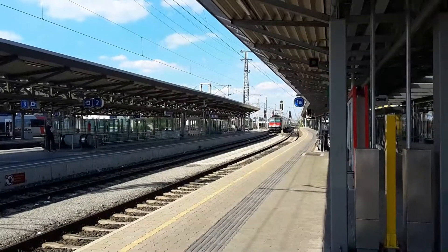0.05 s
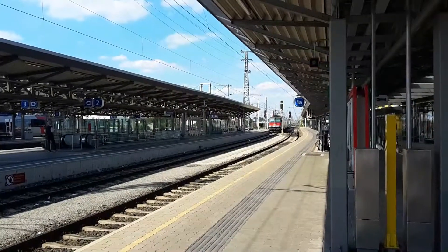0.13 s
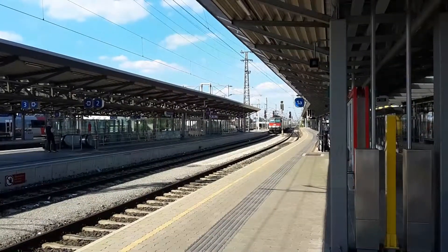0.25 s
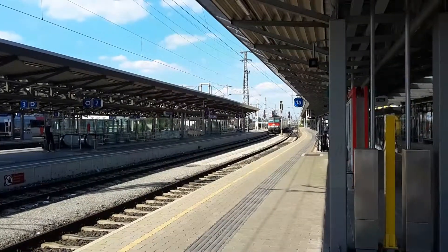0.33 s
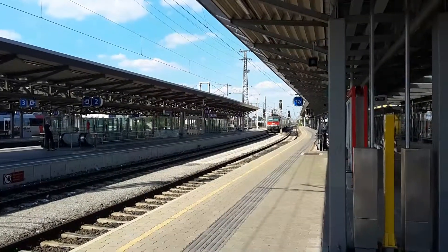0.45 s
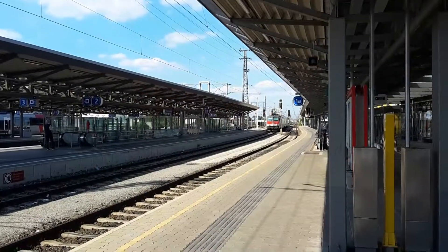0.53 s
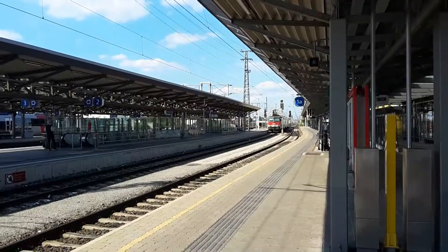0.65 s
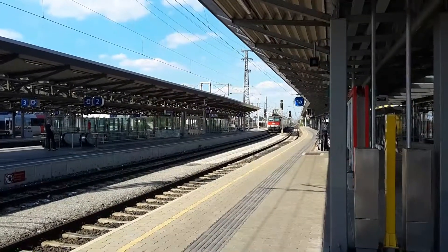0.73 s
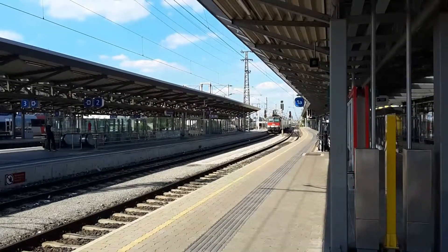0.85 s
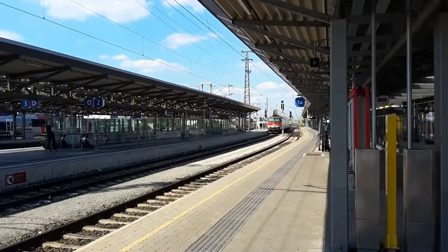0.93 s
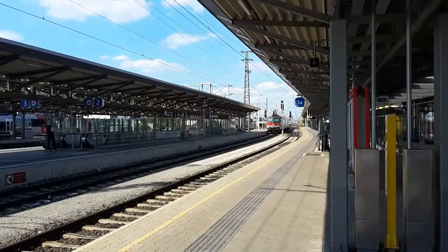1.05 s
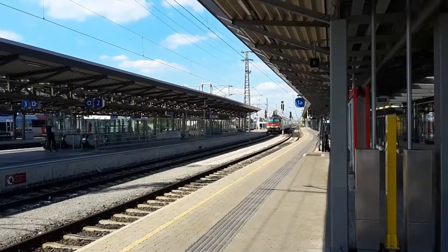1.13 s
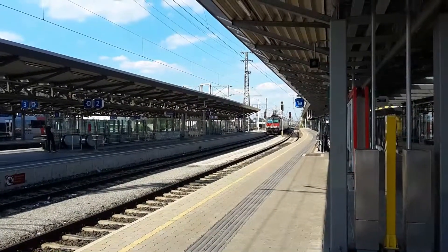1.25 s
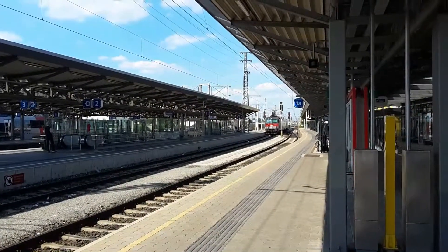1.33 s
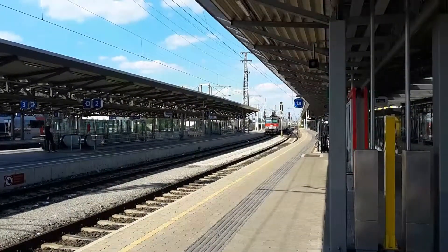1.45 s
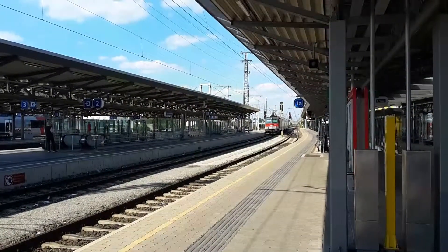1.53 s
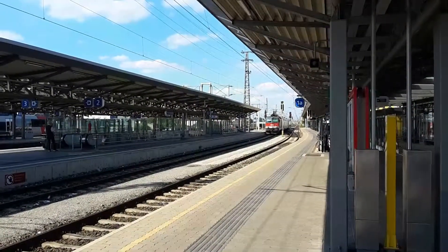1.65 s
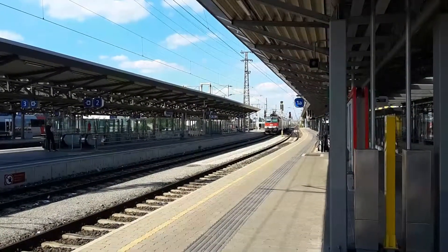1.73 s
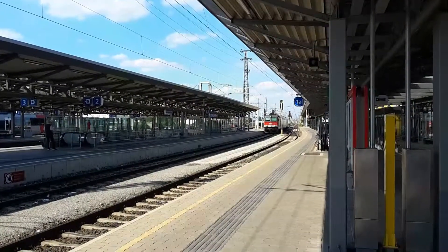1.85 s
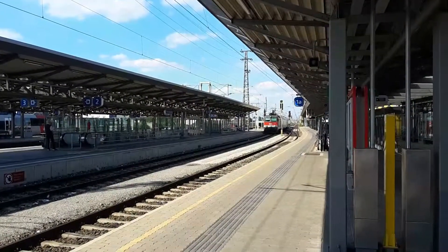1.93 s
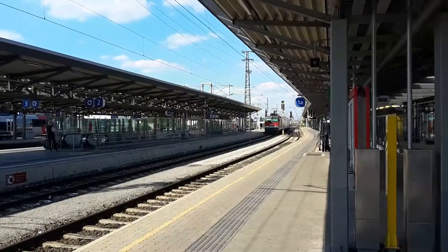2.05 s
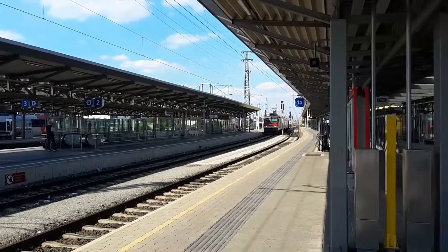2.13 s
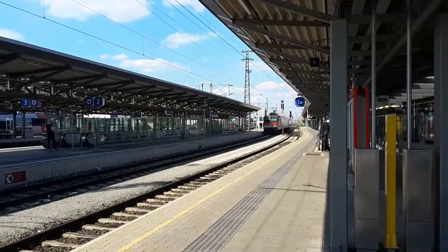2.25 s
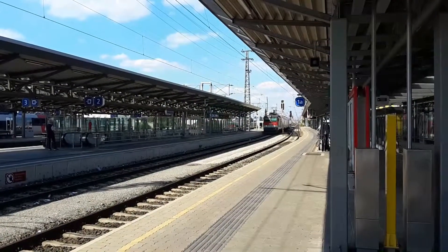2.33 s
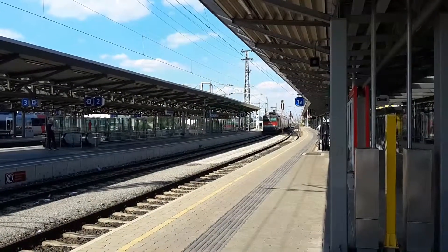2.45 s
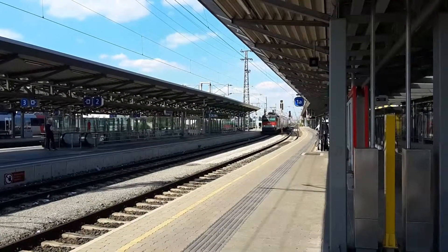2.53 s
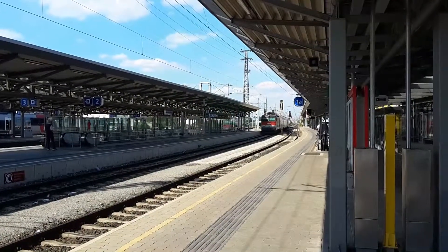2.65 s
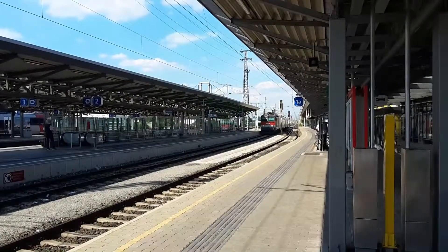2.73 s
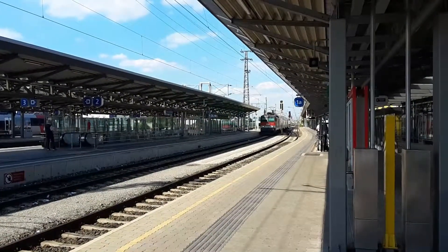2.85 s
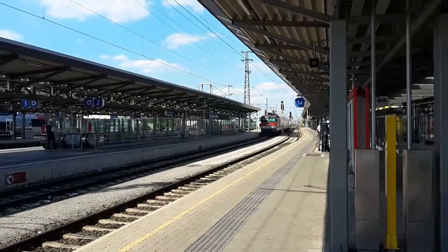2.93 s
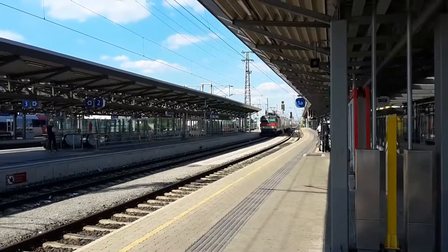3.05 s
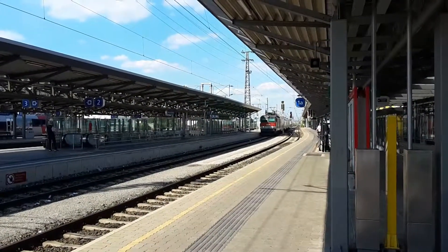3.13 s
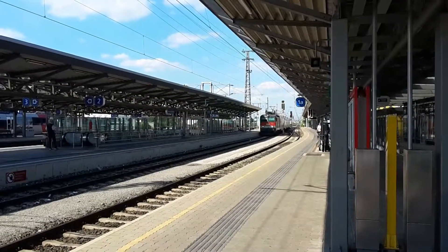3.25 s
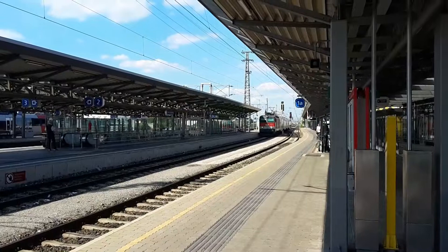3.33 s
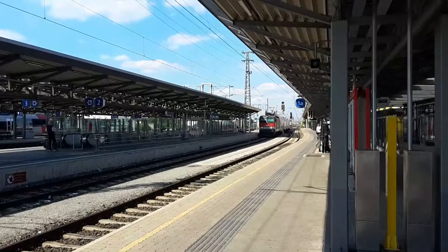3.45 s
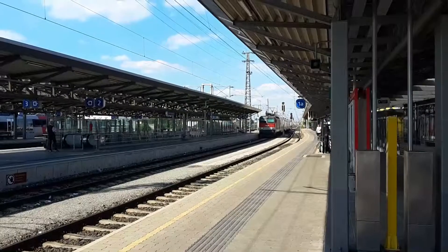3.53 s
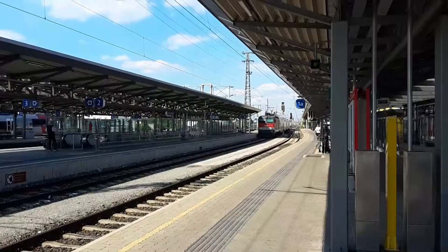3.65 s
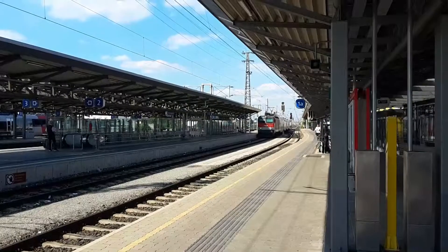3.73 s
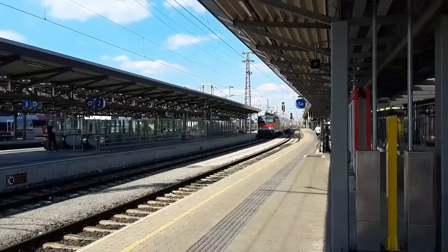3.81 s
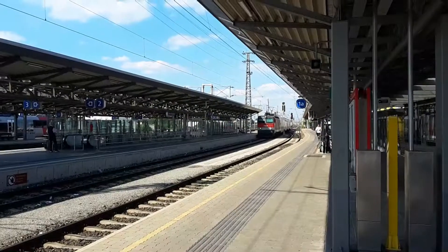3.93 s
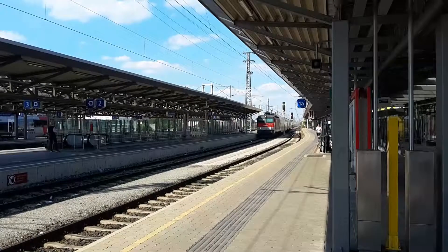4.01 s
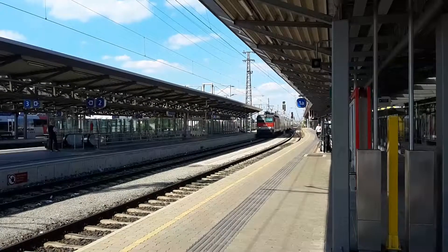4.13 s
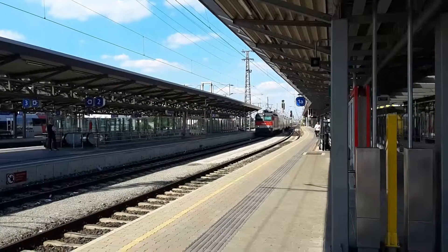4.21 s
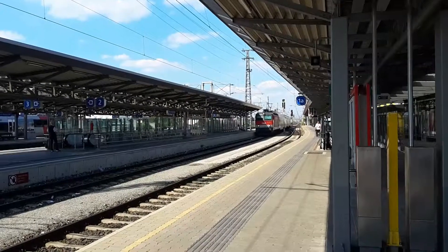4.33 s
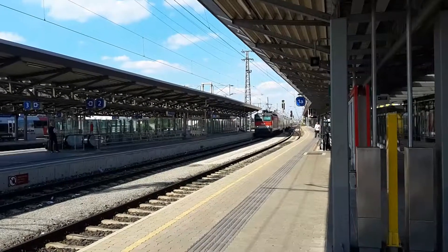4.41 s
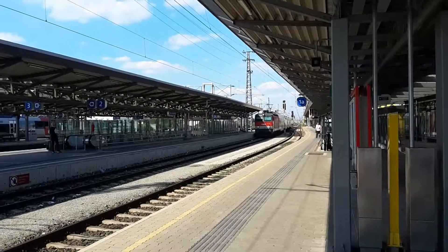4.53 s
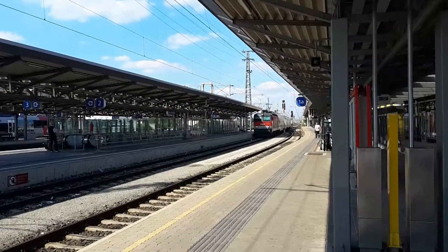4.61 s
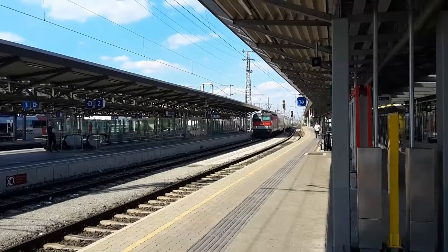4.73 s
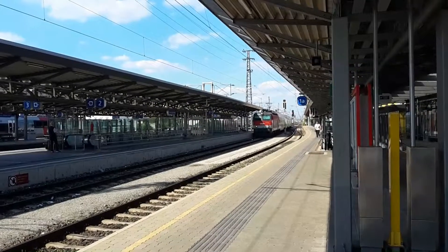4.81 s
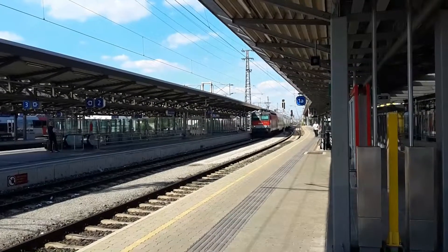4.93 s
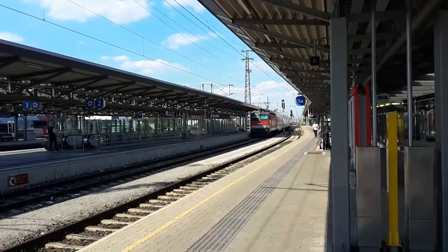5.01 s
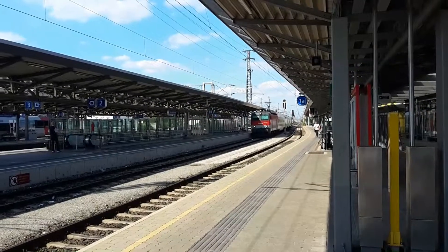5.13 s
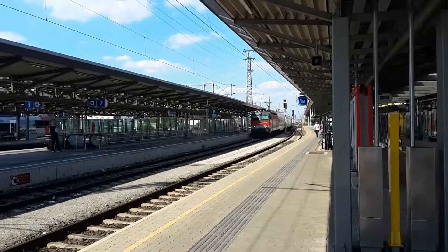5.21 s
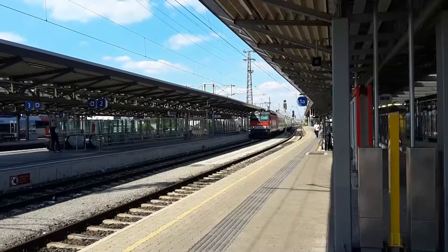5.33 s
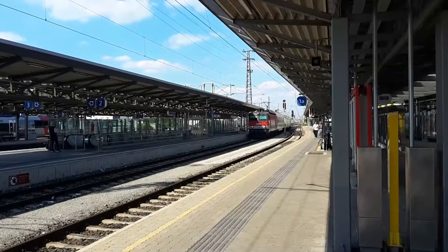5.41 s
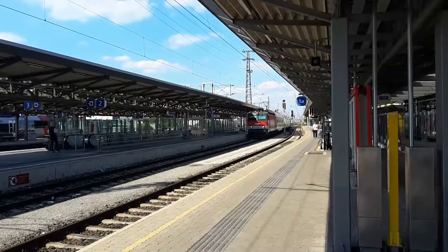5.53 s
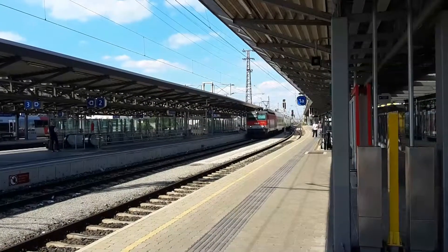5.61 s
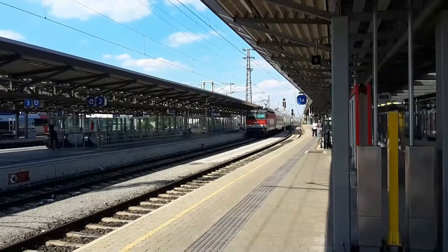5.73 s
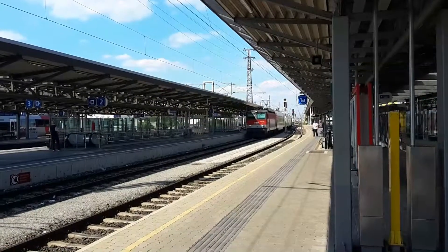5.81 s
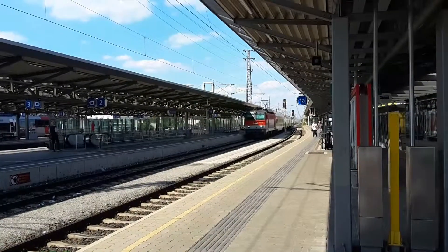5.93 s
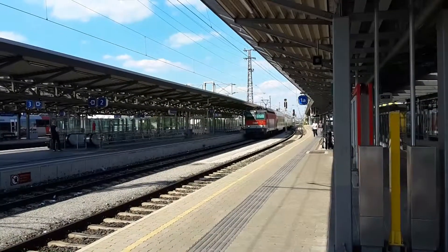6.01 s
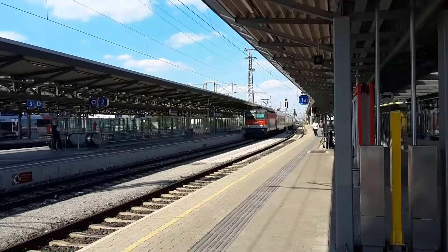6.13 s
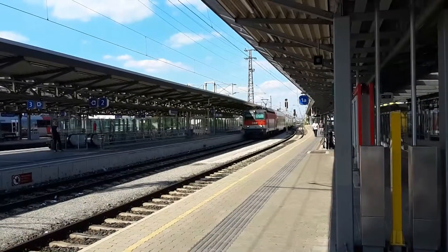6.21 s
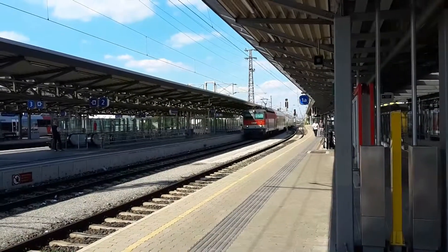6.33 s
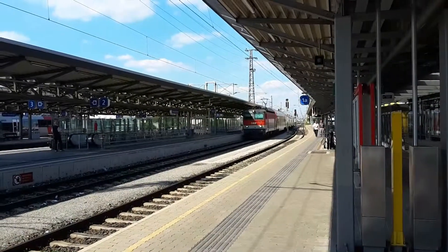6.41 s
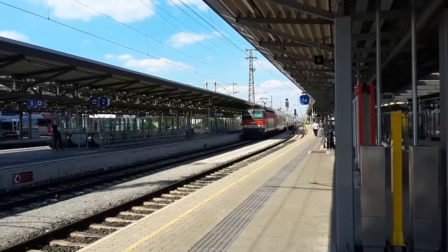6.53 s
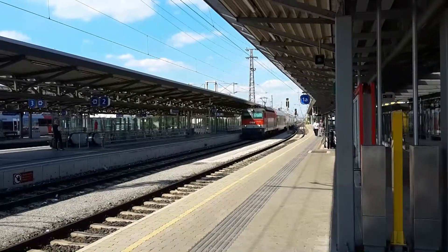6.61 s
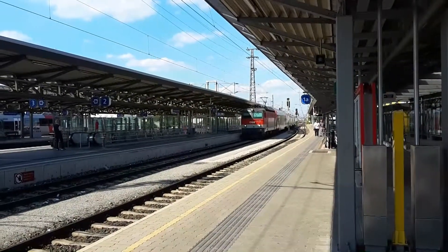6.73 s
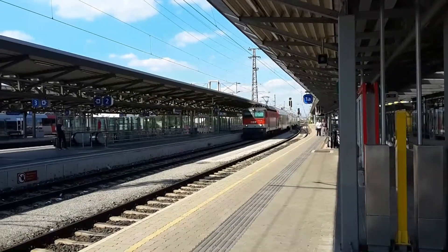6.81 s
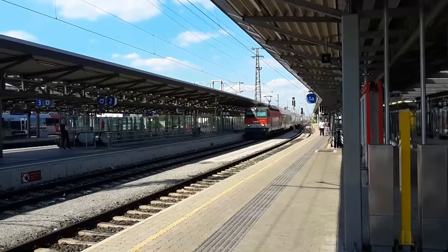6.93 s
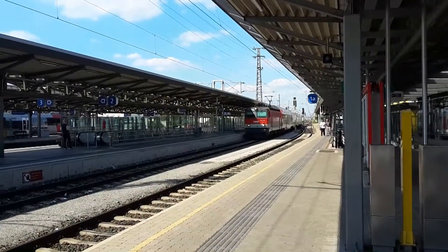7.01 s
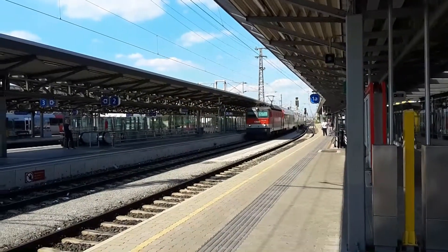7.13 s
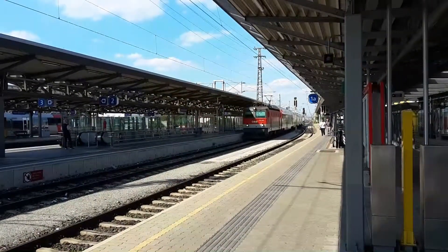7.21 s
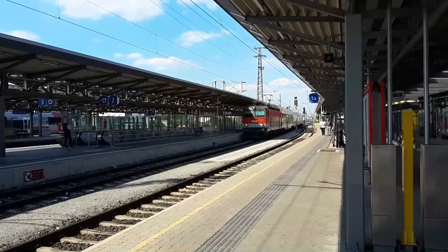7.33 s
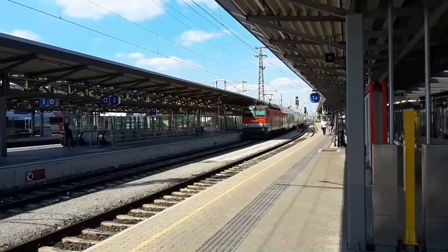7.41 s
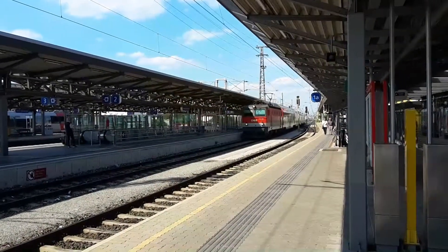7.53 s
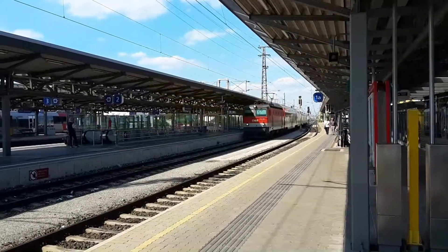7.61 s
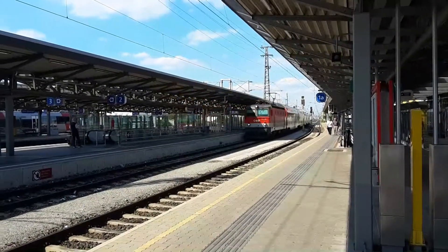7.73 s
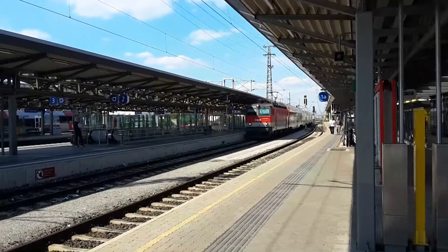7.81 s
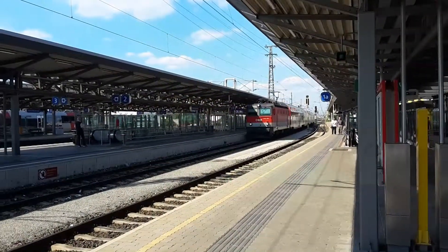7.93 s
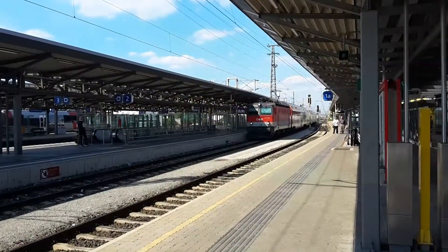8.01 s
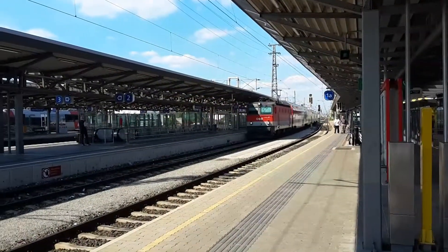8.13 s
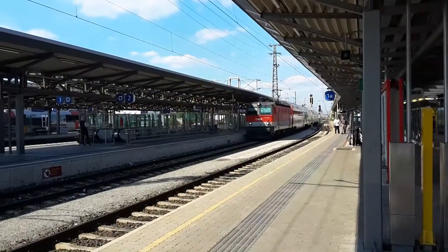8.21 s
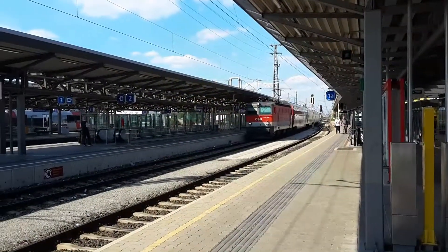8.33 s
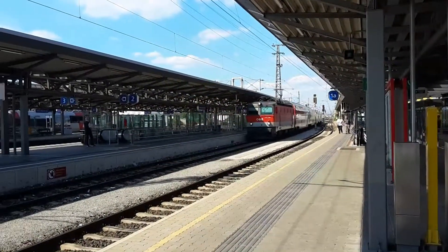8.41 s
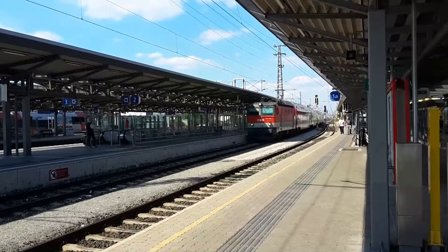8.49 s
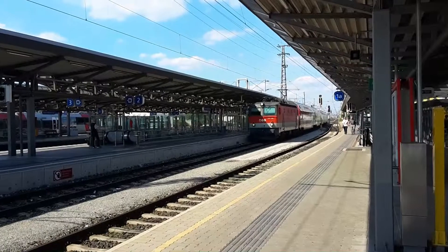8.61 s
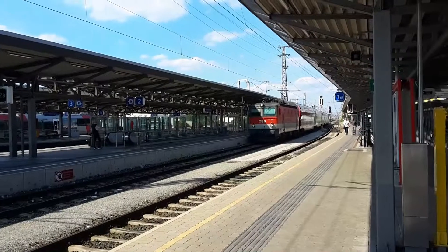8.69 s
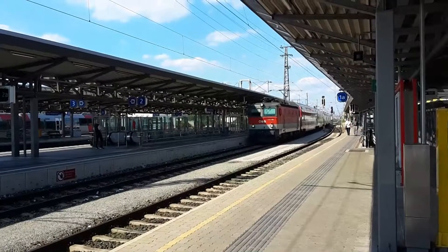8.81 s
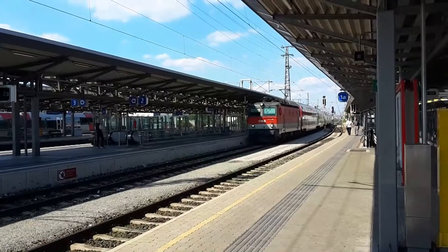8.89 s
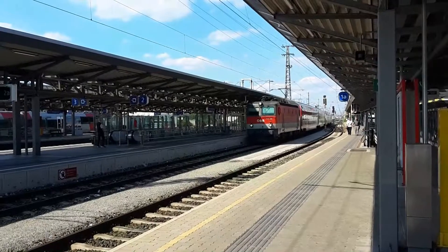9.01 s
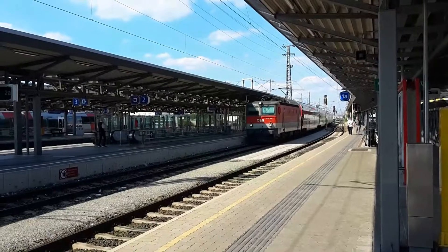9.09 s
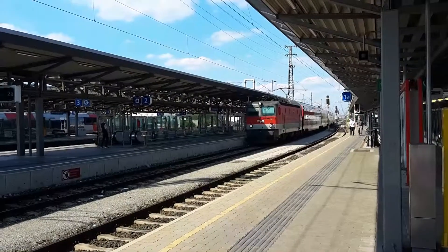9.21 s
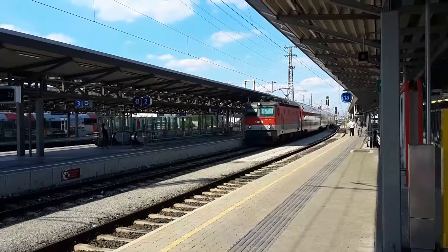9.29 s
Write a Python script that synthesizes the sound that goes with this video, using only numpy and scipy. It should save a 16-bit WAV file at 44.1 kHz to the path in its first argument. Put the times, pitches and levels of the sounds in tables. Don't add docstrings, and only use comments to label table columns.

```python
import sys
import numpy as np
from scipy import signal
from scipy.io import wavfile
from scipy.ndimage import uniform_filter1d

SR = 44100
rng = np.random.default_rng(int(sys.argv[2]) if len(sys.argv) > 2 else 0)


def boost(x):
    u = np.asarray(x, float) / 20
    return 10 ** u


def bounce(signal):
    frames = np.transpose(np.atleast_2d(signal))
    limited = np.clip(frames, -1, 1)
    pcm = np.round(limited * 32767).astype(np.int16)
    wavfile.write(sys.argv[1], SR, pcm)


N = 412776

START_M, START_M_PER_S = 154.5, 15
BRAKE_PER_S, BRAKE_PER_S2 = .027, .00125
SOUND_M_PER_S = 343

ROLLING_HZ = [
    60,
    250,
    1050,
    3000,
]
# nearness_share, track_share [dB per dB]
ROLLING_FOLLOWS = [
    (0.65, .1),
    (1.1, 0.24),
    (0.72, 1.1),
    (0.76, .1),
]
# time_s, level_db
TRACK = [(0, -1), (1.0, -1), (1.9, -0.5), (2.6, 2.5), (3.5, 2.5), (5.4, 3), (7.0, 2.5), (8.0, 3.5),
         (9.36, 3)]
# time_s, half_length_s, rumble_db, bogie_db
SURGES = [(1.7, 0.56, 1, 3.5), (3.1, .5, 3, -2), (3.86, .25, 0, 0), (4.3, 0.19, -2.5, -3.5),
          (4.55, .4, 5, 0.5), (5.9, .4, 3.5, 2), (6.45, .25, 0.5, 2), (7.3, .6, -1, 1.5),
          (8.34, 0.37, 8, -2), (8.97, 0.23, 6.5, -1.5)]
# frequency_hz, density_db [per Hz]
ROAR_SPECTRUM = [(22, -89), (35, -91.5), (60, -59), (110, -61.5), (170, -53.5), (235, -63), (280, -61),
                 (480, -64), (800, -65), (1300, -72.5), (2500, -78), (4000, -88.5), (5200, -92.5),
                 (7500, -95)]
# frequency_hz, likeness [0..1]
LIKENESS = [(60, 0.95), (120, 0.98), (260, 1), (530, 0.87), (1090, 0.49), (2260, 0.04), (4660, 0.037)]
# frequency_hz, left_minus_right_db
TILT = [(60, 0.5), (120, -1.5), (260, 0.5), (530, -0.5), (1090, 1), (2260, -5), (4660, -3)]
AIR_CUT_HZ = 4000
NEAR_BRIGHTENING = 0.33

FAN_HZ, FAN_DB, FAN_FOLLOWS, FAN_TRACK = 608.5, -36.5, 0.88, 0.43
# time_s, half_length_s, level_db
FADES = [(0.0, .12, -8), (.62, .2, -16), (.98, 0.082, -3), (1.1, 0.092, -15.5), (1.72, 0.26, -12),
         (2.18, 0.082, -2.5), (2.28, 0.068, 1), (2.4, .1, -8), (2.7, .1, -6), (3.43, 0.13, -15),
         (3.77, 0.074, -4), (3.9, 0.11, 3.5), (4.04, 0.13, -9.5), (4.37, .09, -11.5), (4.53, .06, -16),
         (4.71, 0.087, -14), (4.88, .06, -13), (5.11, .06, -5), (5.55, 0.55, -7), (6.1, 0.12, -11),
         (6.23, 0.047, -17.5), (6.9, .12, -8), (7.2, .12, -4.5), (7.34, 0.046, 5.5), (7.45, 0.11, -7.5),
         (7.64, 0.12, -9), (7.96, 0.09, -9.5), (8.12, 0.1, -9.5), (8.5, 0.075, -13.5), (8.7, .14, -11),
         (6.7, .07, -5.5), (7.88, .08, -4), (8.25, 0.16, -5), (8.42, .05, 3), (8.861, 0.028, -22),
              (8.989, 0.035, -12), (9.1, 0.045, 2.5), (9.262, 0.059, -5)]
# time_s, half_length_s, level_db, scattered_share_db
SHADOW = [(4.6, .5, -4.5, 8.5), (5.5, 1.7, -2.5, 8), (8.3, 1.9, -2, 3.5)]
FADE_SAG_HZ_PER_DB, FAN_WAVER_HZ = .5, 1.5
HALF_ORDER_DB = -55
# time_s, half_length_s, level_db
HALF_SWELLS = [(3.0, 0.57, 8.8), (3.45, 0.52, 11), (3.9, .2, 9)]

GEAR_HZ, GEAR_DB, GEAR_OCTAVE_DB, GEAR_FOLLOWS = 239.1, -49, -58, 0.88
# time_s, half_length_s, first_order_db, second_order_db
GEAR_LOAD = [(.6, 0.51, 3.5, 1), (2.0, .5, 0, 0), (4.3, 1.24, 9, -4.5), (5.5, .45, -1, 13.5),
             (6.0, 0.22, 7.5, 8.5), (6.6, 0.35, 6, 6), (7.1, 0.52, 5, 2.5), (7.6, 0.55, 8.5, 6),
             (8.3, .2, 8.5, 15), (8.72, 0.37, 7, 16), (8.95, 0.39, 4.5, 12.5), (9.25, .3, 5, 14)]

# pitch_hz, drift_hz_per_s, level_db, nearness_share,
# swell_time_s, swell_half_length_s, swell_db
HUMS = [(233.7, -0.45, -48.5, .4, 5.7, 0.78, 6.5), (178.1, .6, -49, 0.21, 4.2, 3.4, 3.5)]

# time_s, peak_db, pitch_hz, push_or_pull [+1 or -1], port [0 left, 1 right]
POPS = [(0.651, -20.5, 276, 1, 1), (1.283, -27, 178.7, 1, 0), (1.736, -21, 226, 1, 0),
        (2.127, -30, 113, -1, 0), (2.157, -18, 246, 1, 0), (2.42, -27.5, 257, 1, 1),
        (4.105, -24.5, 239.7, 1, 0), (4.351, -10.5, 121, -1, 0), (4.380, -15, 116.6, -1, 0),
        (4.409, -14, 110, -1, 0), (4.453, -17, 101, -1, 0), (4.491, -19.5, 98, -1, 0),
        (4.545, -21.5, 100.7, -1, 0), (4.593, -20, 222, 1, 0), (4.638, -20, 111, -1, 0),
        (4.693, -1, 205, 1, 0), (4.709, -20, 148, -1, 0), (4.831, -17.5, 138, -1, 0),
        (4.847, -10.5, 170, 1, 0), (4.863, -26, 226, 1, 0), (7.355, -19, 293, 1, 1)]
POP_EDGE = .45

# time_s, length_s, level_db
TREBLE_BURST = (8.73, .014, -71)
# centre_hz, width_hz, level_db
SELF_NOISE = [(7000, 1400, -83), (10120, 720, -80), (12660, 4200, -72.5)]

BAR_WAVER_DB = 1.1
# time_s, tick_db [height of the sample left standing]
RESTARTS = [(1.05188, -54), (9.05188, -21.5)]
FADE_IN_S = .021


def roar(patchy_db, throb_db):
    swell = [level - level.mean() for level in rolling()]
    out, together = 0, drift(4.4)
    edges = 20 * 2 ** (np.arange(27) / 3)
    white = rng.standard_normal((2, 2, N + SR))
    for k, (low, high) in enumerate(zip(edges, edges[1:])):
        mid, side = band(white[k % 2], low, high)[:, SR:]
        hz = np.sqrt(low * high)
        place = np.interp(np.log(hz), np.log(ROLLING_HZ), np.arange(4))
        below = min(int(place), 2)
        level_db = swell[below] * (below + 1 - place) + swell[below + 1] * (place - below)
        octaves_above = max(np.log2(hz / ROLLING_HZ[-1]), 0)
        level_db = level_db * (1 + NEAR_BRIGHTENING * octaves_above)
        level_db = level_db + at_hz(ROAR_SPECTRUM, hz)
        level_db = level_db + throb_db * together + patchy_db * drift(2.0)
        alike = np.clip(at_hz(LIKENESS, hz), 0, 1)
        lean = boost(at_hz(TILT, hz) / 2 * np.array([[1], [-1]]))
        pair = np.sqrt(1 + alike) * mid + np.sqrt(1 - alike) * side * [[1], [-1]]
        out = out + boost(level_db) * lean * pair
    air = signal.butter(4, AIR_CUT_HZ, fs=SR, output="sos")
    return signal.sosfilt(air, out) * np.sqrt(SR) / 2


def rolling():
    levels = np.array(ROLLING_FOLLOWS) @ np.array([nearness(), in_time(TRACK)[0]])
    levels[:2] += spells(SURGES)
    return levels


def fan():
    fade_db = spells(FADES)[0]
    shade_db, blur_db = spells(SHADOW)
    late = 1 - speed()
    approach_m_per_s = START_M_PER_S * (.45 + .55 * speed())
    hz = FAN_HZ / (1 - approach_m_per_s / SOUND_M_PER_S)
    hz = hz + late * (FADE_SAG_HZ_PER_DB * fade_db + FAN_WAVER_HZ * 3 * drift(2.87))
    level_db = FAN_DB + FAN_FOLLOWS * nearness() + FAN_TRACK * in_time(TRACK)[0]
    level_db = level_db + fade_db + shade_db
    smooth_db = uniform_filter1d(level_db, size=SR)
    half_db = HALF_ORDER_DB + spells(HALF_SWELLS)[0]
    blade = tone(hz, level_db, scatter_db=-10.5 + blur_db, spread=42.0, side_db=-17.0, pan_db=-1.5)
    half = tone(hz / 2, half_db, scatter_db=-10.5, spread=2.4, side_db=-24.0, pan_db=-2.0)
    double = tone(hz * 2, smooth_db - 24.0, scatter_db=2.0, spread=29.0, side_db=5.5, pan_db=-4.0)
    return blade + half + double


def gears():
    hz = GEAR_HZ * speed()
    start_db = [[GEAR_DB], [GEAR_OCTAVE_DB]]
    first_db, second_db = spells(GEAR_LOAD) + GEAR_FOLLOWS * nearness() + start_db
    first = tone(hz, first_db, scatter_db=-6.5, spread=5.2, side_db=-21.0, pan_db=-0.3)
    second = tone(hz * 2, second_db, scatter_db=-8, spread=3.0, side_db=-15, pan_db=-.4)
    return first + second


def rail_hum():
    t, out = np.arange(N) / SR, 0
    for hz, slide, db, share, *swell in HUMS:
        level_db = db + share * nearness() + spells([swell])[0]
        out = out + tone(hz + slide * t, level_db, scatter_db=6.5, spread=12.2, side_db=-17, pan_db=-0.5)
    return out


def wind_pops():
    out, t = np.zeros((2, N)), np.arange(-400, 1800) / SR
    for s, peak_db, hz, push, port in POPS:
        jump = np.exp(np.where(t < 0, t * hz / .112, -t * hz / .79))
        low_cut = signal.butter(3, .8 * hz, "high", fs=SR, output="sos")
        swing = signal.sosfilt(low_cut, jump)
        soft_cut = signal.butter(2, hz ** 3 / 7000, fs=SR, output="sos")
        sharp_cut = signal.butter(4, hz ** 3 / 2500, fs=SR, output="sos")
        soft, sharp = signal.sosfilt(soft_cut, swing), signal.sosfilt(sharp_cut, swing)
        swing = soft + POP_EDGE * (sharp - soft)
        deepest = np.argmin(swing)
        start = round(s * SR) - deepest
        pop = np.sign(push) * boost(peak_db) * swing / swing[deepest]
        out[int(round(port)), start:start + len(t)] += pop
    return out


def treble_burst():
    s, length, level_db = TREBLE_BURST
    shape = np.exp(-((np.arange(N) / SR - s) / length) ** 2)
    return boost(level_db) * shape * band(rng.standard_normal((2, N)), 6500, 15000)


def self_noise():
    white = rng.standard_normal((2, N)) + 0.57 * rng.standard_normal(N)
    out = 0
    for hz, width, db in SELF_NOISE:
        hiss = band(white, hz - width / 2, hz + width / 2, order=6)
        out = out + boost(db) * hiss / hiss.std()
    return out


def speed():
    t = np.arange(N) / SR
    return 1 - BRAKE_PER_S * t - BRAKE_PER_S2 * t ** 2


def nearness():
    travelled_m = np.cumsum(START_M_PER_S * speed()) / SR
    return -20 * np.log10(np.clip(1 - travelled_m / START_M, .05, 1))


def tone(hz, level_db, scatter_db, spread, side_db, pan_db):
    turn = np.exp(2j * np.pi * np.cumsum(hz) / SR)
    waver = [(drift(spread) + 1j * drift(spread)) / np.sqrt(2) for path in range(2)]
    mid = (1 + boost(scatter_db) * waver[0]) * turn
    side = boost(side_db) * waver[1] * turn
    pair = np.real([mid + side, mid - side]) * boost(np.array([[pan_db], [-pan_db]]) / 2)
    return np.sqrt(2) * boost(level_db) * pair


def drift(rate):
    r = np.exp(-80 * np.pi * rate / SR)
    slow = signal.lfilter([1], [1, -2 * r, r * r], rng.standard_normal(N // 40 + 2002))[2000:]
    return np.interp(np.arange(N) / 40, np.arange(len(slow)), slow / slow.std())


def spells(rows):
    out, t = np.zeros((len(rows[0]) - 2, N)), np.arange(N) / SR
    for s, half, *db in rows:
        inside = slice(max(int((s - half) * SR), 0), int((s + half) * SR))
        out[:, inside] += np.outer(db, 1 - abs(t[inside] - s) / half)
    return out


def in_time(rows):
    s, *columns = np.transpose(rows)
    return [np.interp(np.arange(N) / SR, s, c) for c in columns]


def at_hz(points, hz):
    table = np.array(points)
    return np.interp(np.log(hz), np.log(table[:, 0]), table[:, 1])


def band(x, low_hz, high_hz, order=2):
    return signal.sosfilt(signal.butter(order, [low_hz, high_hz], "band", fs=SR, output="sos"), x)


def thin_treble(x, floor_db, follow, from_hz):
    window = np.sin(np.pi * (np.arange(2048) + .5) / 2048)
    hz, t, cells = signal.stft(x, SR, window, nperseg=2048, boundary="even")
    power = uniform_filter1d(np.sum(abs(cells) ** 2, axis=(0, 1)), size=45)
    loud_db = 10 * np.log10(power + 1e-12)
    bar = boost(floor_db + follow * (loud_db + 34.5))
    patches = rng.standard_normal((len(hz) // 24 + 1, len(t) // 3 + 1))
    patches = patches.repeat(24, axis=0).repeat(3, axis=1)
    bar = bar * boost(BAR_WAVER_DB * patches[:len(hz), :len(t)])
    kept = (abs(cells) > bar) | (hz < from_hz)[:, None]
    return signal.istft(cells * kept, SR, window, nperseg=2048)[1][:, :N]


def scene():
    train = roar(patchy_db=0.38, throb_db=0.27) + fan() + gears() + rail_hum()
    return train + wind_pops() + self_noise()


def low_pass(x):
    return signal.sosfilt(signal.butter(12, 15900, fs=SR, output="sos"), x)


def record(dry):
    t = np.arange(N) / SR
    out = thin_treble(dry, floor_db=-97.5, follow=0.54, from_hz=3300)
    out += treble_burst()
    for s, tick_db in RESTARTS:
        before = np.exp(np.minimum(t - s, 0) / .00015)
        after = np.sin(np.pi / 2 * np.clip((t - s) / FADE_IN_S, 0, 1))
        out = np.where(t < s, out * (1 - before) + boost(tick_db) * before, out * after)
    return low_pass(out)


dry = scene()
out = record(dry)
bounce(out)
```